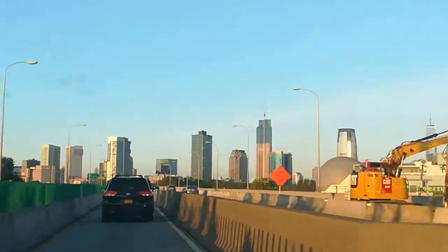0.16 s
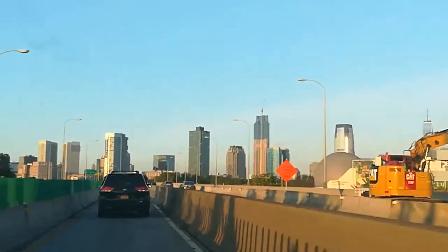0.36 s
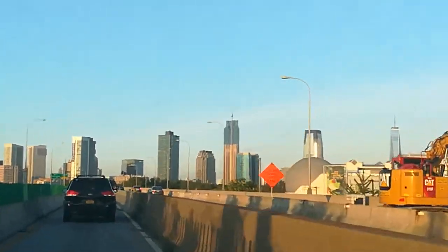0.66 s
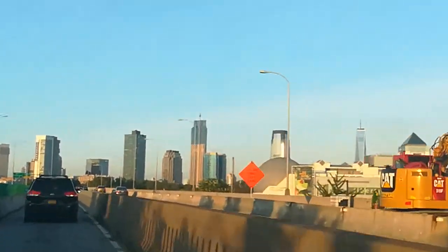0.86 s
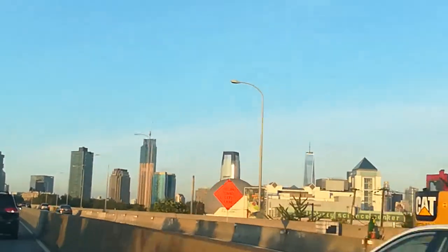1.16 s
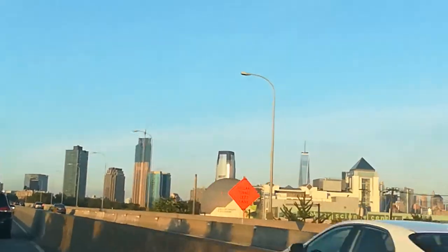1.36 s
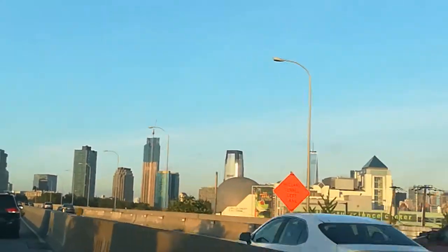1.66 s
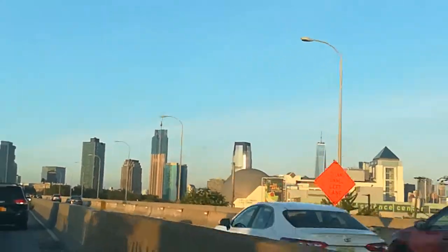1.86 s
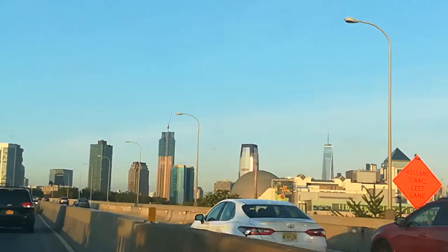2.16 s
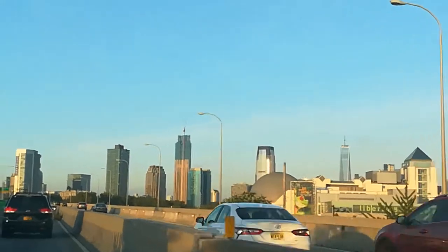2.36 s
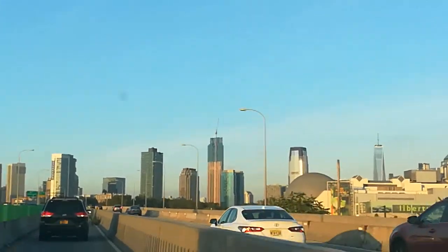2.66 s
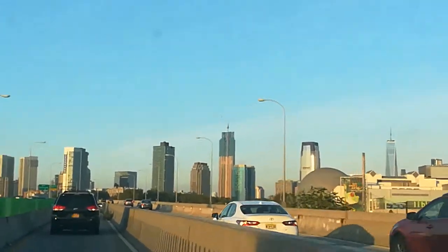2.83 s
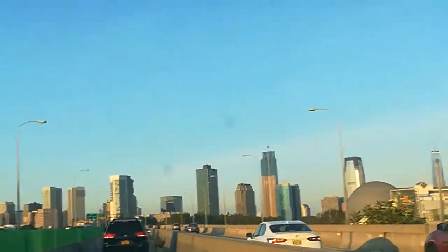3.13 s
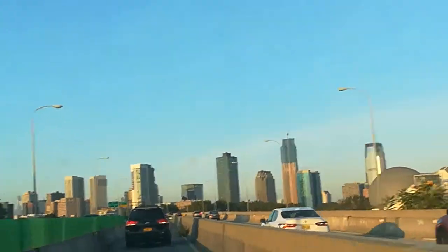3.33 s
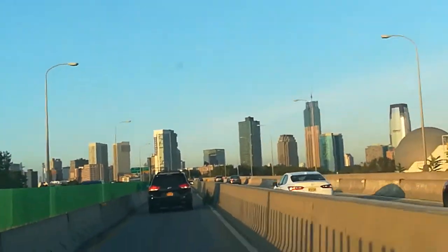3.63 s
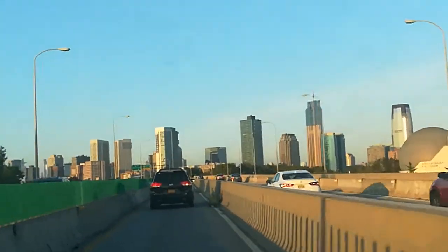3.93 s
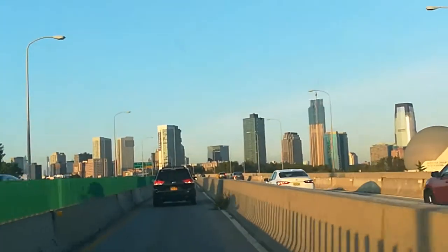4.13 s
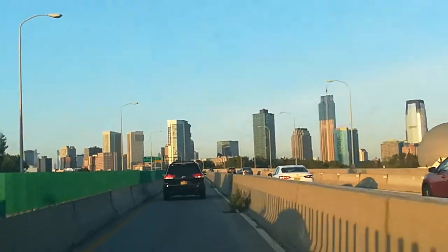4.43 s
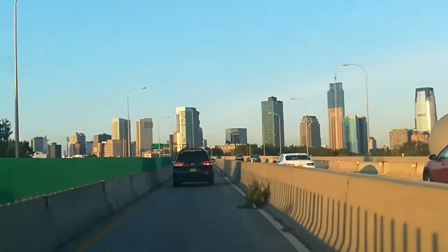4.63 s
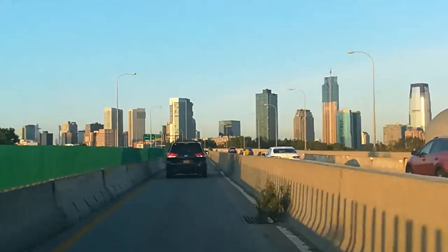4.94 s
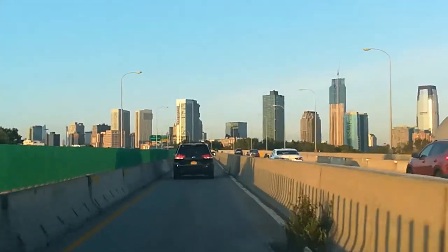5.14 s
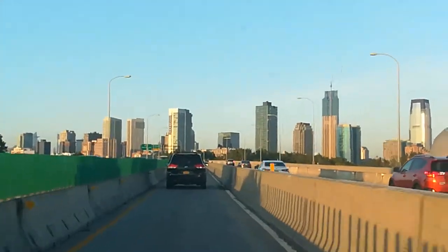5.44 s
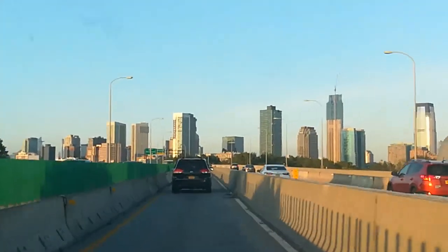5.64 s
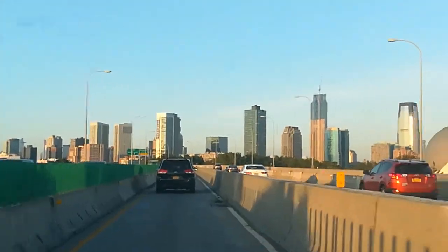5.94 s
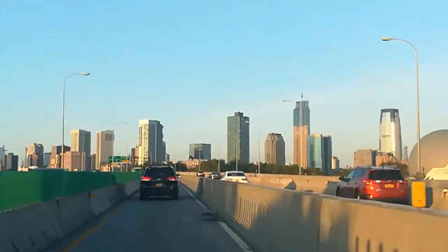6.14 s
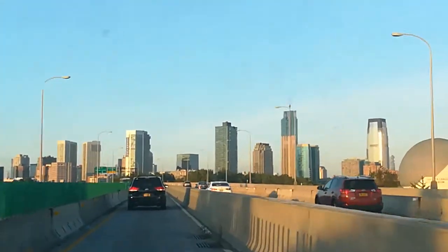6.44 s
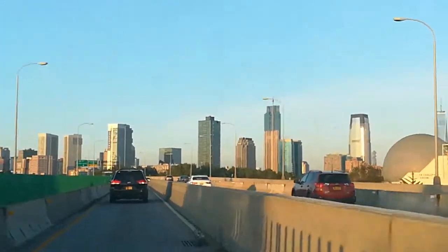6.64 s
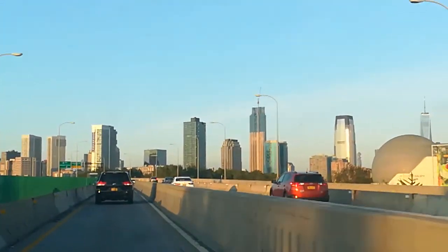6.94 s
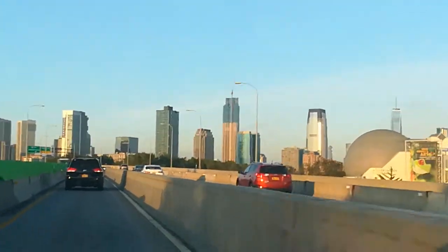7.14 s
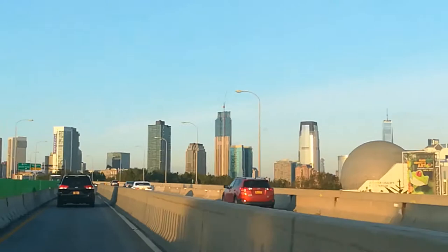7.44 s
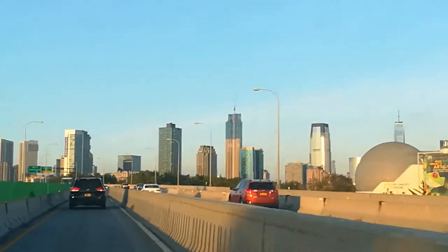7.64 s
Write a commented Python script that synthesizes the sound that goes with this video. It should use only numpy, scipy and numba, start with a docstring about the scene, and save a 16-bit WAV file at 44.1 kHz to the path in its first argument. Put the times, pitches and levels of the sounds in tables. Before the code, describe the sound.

A car cruises along a concrete highway, heard from inside through a hand-held stereo microphone near the windscreen. A deep, uneven rumble and cabin drone run throughout, with tyre roar and a softer wind hiss coming through the glass. From about 1 to 1.8 seconds the tyres knock lightly over seams, and plastic trim gives small, high squeaks and ticks towards the left. Between 2.3 and 3.1 seconds comes the loudest part, a run of heavy thumps and low booms, with sharp overload clicks around 2.7 seconds. The overall level then drops a little and stays there. The rumble carries on with gentle swells and a few faint rattles between 3.8 and 6 seconds, while the hiss shifts subtly in tone as the microphone turns. Another cluster of dull thumps arrives from about 7 to 7.6 seconds, over the continuing road noise.

```python
"""Car cabin on a concrete overpass

From inside the cruising car, on a hand-held two-microphone recorder close to the windscreen.
The rough road shakes the body and booms in the cabin's low modes; the tyres thump over seams.
Tyre roar and wind hiss come through the glass, the trim rattles and squeaks, and the hardest bumps click
with overload. As the hand turns, a near echo on the left and a hollow on the right slide in pitch."""
import sys
import numpy as np
from scipy import signal
from scipy.fft import rfft, irfft, next_fast_len
from scipy.io import wavfile
from scipy.ndimage import uniform_filter1d
from numba import njit

SR = 44100
rng = np.random.default_rng(int(sys.argv[2]) if len(sys.argv) > 2 else 0)


def output_pcm(signal):
    """Save a mono or channel-first signal as 16-bit PCM at the path in sys.argv[1].

    Samples are clipped to [-1, 1] before scaling.
    """
    pcm = np.clip(np.atleast_2d(signal).T, -1, 1) * 32767
    wavfile.write(sys.argv[1], SR, np.round(pcm).astype(np.int16))


N = 343539

# Balance of the microphone pair: (frequency [Hz], left over right [dB])
MIC_BALANCE = [(150, 0), (270, 1), (450, 0.5), (740, 4.5), (1220, 0.5), (1800, 3.5), (2300, 3), (2800, 2),
               (3400, 3.5), (5500, 4), (7000, -4.5), (9000, -10.5), (12500, -10), (15000, -3)]
# Part of the sound that each microphone has to itself: (frequency [Hz], level against the whole [dB])
MIC_OWN_SHARE = [(30, -33), (70, -25), (130, -20), (200, -6), (270, -9.5), (330, -2.5), (520, -3),
                 (700, -6.5), (900, -1), (1800, -2), (2500, -3), (3200, -2), (5000, -1), (9000, 0)]
# Standing waves between glass and dashboard at each microphone: (frequency [Hz], width [Hz], weight [dB])
LEFT_STANDING_WAVES = [(433, 59, 2.5), (580, 410, -8), (825, 44, 0.5), (1010, 25, 3.5), (3060, 93, 1.5)]
RIGHT_STANDING_WAVES = [(536, 12, 5.5), (666, 35, 7.5), (1003, 97, -1), (1175, 90, 1), (1486, 24, 6.5),
                        (2860, 70, -9)]
# The hand turns: (time [s], band lifted on the left [Hz], echo strength [0-1], hollow on the right [Hz])
HAND_TURNS = [(0, 2100, 0.06, 1730), (.6, 2180, 0.1, 1770), (1.0, 4560, 0.33, 2100),
              (1.5, 5400, 0.46, 2120), (1.9, 4340, 0.38, 2050), (2.8, 4150, 0.2, 1950),
              (3.1, 5030, 0.3, 1950), (3.4, 3950, 0.22, 1970), (4.3, 3850, 0.32, 1970),
              (4.7, 2190, 0.07, 1820), (6.0, 2150, 0.06, 1760), (6.5, 2400, 0.26, 1660),
              (7.79, 2420, 0.35, 1550)]
# How the recorder is held: (time [s], pose [0 tipped, 1 facing ahead, 2 or more turned aside])
RECORDER_POSE = [(0, 1.2), (.6, 1.4), (.95, 1.8), (2.9, 2.7), (4.35, 1.75), (4.7, 1.2), (6.0, 0.73),
                 (6.5, 0.05), (7.0, 0.3), (7.79, 0.15)]
# Peaks and dips from glass and hand close to each microphone:
# (frequency [Hz], width [Hz], gain tipped [dB], gain ahead [dB], gain aside [dB])
LEFT_POSE_COLOUR = [(844, 100, 1, 1.5, 1), (980, 120, 0, -4.5, -2), (1200, 150, 4, 5.5, 3),
                    (1450, 210, -2, -7, 2), (1730, 180, -1, -5, -5.5), (2100, 150, 0, 9, 1),
                    (2190, 100, 2, -2, 0), (2416, 81, 4.5, 6.5, 2.5), (2700, 200, -0.5, 3.5, 1),
                    (3150, 200, -1, 3.5, -1.5), (3680, 200, 0.5, -5.5, 0), (4070, 300, -0.5, -2, 1),
                    (4640, 200, 4.5, 2.5, 1), (5720, 400, 3, 4.5, 0), (7400, 500, 3, 6.5, 3)]
RIGHT_POSE_COLOUR = [(1100, 120, -1.5, 1, 1), (1340, 250, -1.5, -1.5, -3), (2017, 120, 10.5, 7, 8),
                     (1765, 110, -7, 2, 3), (2270, 240, 2, -2, 2.5), (2660, 320, -3.5, -1.5, -2.5),
                     (3130, 250, 0, 2, -2.5), (3680, 200, -10, -4.5, -3), (3870, 200, 7, 1.5, 4.5),
                     (4150, 200, -1, 3, -2), (5200, 350, 5, 4, -3), (5840, 250, 2, -4, 8.5)]

# Tyres heard through the glass: (time [s], roar [dB], low tread whine [dB], high tread whine [dB])
TYRE_LEVELS = [(0, -39, -68, -68), (.8, -38.5, -53, -52), (1.0, -37.5, -47, -55), (1.3, -39, -51, -56),
               (1.6, -35.5, -47, -50), (2.2, -38.5, -52, -61), (2.35, -38.5, -58, -61),
               (2.9, -38, -58, -57), (3.2, -35.5, -65, -72), (3.4, -38.5, -47, -64), (4.3, -37.5, -60, -60),
               (5.2, -38, -70, -73), (6.0, -39, -59, -49), (6.4, -39.5, -58, -54), (6.9, -37.5, -55, -50),
               (7.4, -39.5, -53, -45.5), (7.79, -36.5, -68, -51)]
# Spectra of tyre roar and wind hiss: (frequency [Hz], relative level [dB])
ROAR_SPECTRUM = [(170, -16.5), (290, -5.5), (306, -3), (363, -8), (422, -8.5), (472, -9), (518, -9.5),
                 (754, -11), (1010, -12), (1400, -22.5), (1820, -18.5), (3080, -120)]
WIND_SPECTRUM = [(760, -30), (1300, 2.5), (1530, 1), (2050, -2), (2250, -2), (2860, -3.5), (3180, -4),
                 (3600, -3), (4760, -6), (5740, -8.5), (6300, -10.5), (9640, -19), (15600, -26.5)]
# Tread blocks singing, low and high: (frequency [Hz], width [Hz], relative level [dB])
LOW_TREAD_BANDS = [(885, 79, -4), (978, 60, 3)]
HIGH_TREAD_BANDS = [(1513, 87, 0.5), (1616, 67, 2.5)]
# Sharp ticks: trim rattles, and overload clicks on the hardest bumps:
# (time [s], peak [dB], decay [s], low edge [Hz], top edge [Hz])
SHARP_TICKS = [(1.302, -45, .004, 8000, 12000), (1.487, -50, .004, 11000, 15400),
               (1.681, -48, .004, 11500, 15400), (1.733, -44, .004, 8000, 15000),
               (2.344, -50, .005, 11000, 15400), (2.6845, -32, .001, 2800, 15400),
               (2.754, -27, .008, 2800, 7000), (2.757, -40, .008, 7000, 15400),
               (2.821, -43, .003, 5000, 13000), (2.98, -44, .004, 8000, 15400),
               (2.752, -29, .01, 1200, 2800), (3.81, -48, .004, 11500, 15400),
               (4.35, -50, .015, 13500, 15400), (4.456, -46, .006, 12300, 13300),
               (5.264, -43, .006, 8500, 13000), (5.285, -43, .022, 8500, 14500),
               (6.024, -47, .005, 8000, 12000), (6.072, -47, .009, 11500, 15400)]
# The main trim squeaks, near the left microphone: (time [s], pitch [Hz], level [dB], length [s])
TRIM_SQUEAKS = [(1.27, 5770, -56, 0.046), (1.378, 5700, -40.5, 0.026), (1.46, 6200, -47, .035),
                (1.463, 4600, -45, 0.041), (1.486, 5700, -50, .04), (1.548, 5300, -44, 0.055),
                (1.585, 5250, -44, 0.07), (1.587, 5950, -47, 0.034), (1.62, 6250, -49, 0.066),
                (1.668, 5300, -46, 0.032), (1.685, 5950, -49, 0.037), (1.72, 4700, -43, 0.021),
                (1.753, 5200, -48, .025)]

# Roughness of the road under the wheels: (time [s], body boom [dB], cabin drone [dB], tyre hum [dB])
ROAD_ROUGHNESS = [(0, -25.5, -30, -29.5), (.5, -28, -24.5, -34), (.9, -20, -26, -30),
                  (1.2, -25.5, -28, -30.5), (1.65, -20.5, -22.5, -30.5), (2.2, -27, -30.5, -32),
                  (2.3, -23, -20.5, -29), (2.6, -15, -22, -29.5), (2.85, -20, -20, -29.5),
                  (3.1, -19, -21.5, -31.5), (3.3, -21, -22, -31), (3.9, -25, -29, -32),
                  (4.4, -19.5, -23.5, -31), (4.85, -28, -24.5, -32), (5.3, -25, -24.5, -30.5),
                  (5.9, -21.5, -26, -32), (6.2, -27, -29, -34), (6.9, -24, -25, -28),
                  (7.3, -15, -18, -32.5), (7.79, -22, -26, -33)]
# Modes of the body on its mounts, of the cabin air, and of tyre cavity and floor:
# (frequency [Hz], width [Hz], relative level [dB])
BODY_MODES = [(19.5, 3.8, 6.5), (27.5, 8.2, 5), (39.4, 6.5, 2), (43.1, 10.3, 4)]
CABIN_MODES = [(79.4, 22.7, -1), (98.3, 8.8, -1.5), (123.5, 14.8, -2.5), (136, 17.8, -5)]
TYRE_FLOOR_MODES = [(167.8, 32.5, -0.5), (209, 61, -5.5), (244.3, 60, -5.5), (267.5, 20.8, -2)]
# The upper body modes against the lower ones: (time [s], gain [dB])
UPPER_BODY_GAIN = [(0, 2), (.9, 3.5), (1.7, 1.5), (2.3, 0.5), (2.5, -6), (2.8, -1.5), (3.1, 3.5),
                   (4.4, 1.5), (5.1, 3), (5.4, 3), (5.9, 6), (6.4, 4.5), (7.0, 2), (7.79, 0)]
# The body heaves on its springs: (time of the crest [s], boom [dB])
BODY_HEAVES = [(.21, -18), (.77, -18), (1.0, -31), (1.72, -21), (2.33, -8.5), (2.44, -22), (2.544, -2),
               (2.62, -15), (2.69, -2.5), (2.75, -5), (2.99, -1), (3.07, -4.5), (3.5, -27), (4.41, -17),
               (5.12, -17), (5.2, -21), (5.28, -20), (5.33, -11.5), (5.8, -16), (5.9, -28), (7.17, -12),
               (7.3, -26), (7.4, -15), (7.54, -10), (7.62, -18)]
# Wheels over seams, mostly front then rear: (time [s], knock strength [dB], left over right [dB],
# knock centre [Hz], cabin drone strength [dB], tyre hum strength [dB])
ROAD_SEAMS = [(1.0, -39, -8, 900, -20, -25), (1.18, -41, -13, 660, -23, -37),
              (1.51, -34.5, -11, 990, -20.5, -24), (1.681, -31, -3, 680, -23, -50),
              (2.268, -45, 0, 600, -19.5, -34), (2.295, -35, 0, 700, -14, -28),
              (2.387, -42, 0, 500, -32, -41), (2.455, -27, 0, 840, -13, -24.5),
              (2.531, -30, -1, 1000, -17.5, -41), (2.56, -29, -11, 700, -37, -45),
              (2.591, -26, -1, 1080, -34, -36), (2.645, -43, -6, 1780, -26, -22),
              (2.769, -32, 5, 800, -14.5, -20), (2.849, -33, 9, 700, -14.5, -48),
              (2.95, -28, 0, 705, -8.5, -26), (7.06, -38, 5, 400, -23, -33), (7.155, -26, 3, 403, -27, -34),
              (7.184, -32, -1, 407, -23, -26), (7.24, -32, -3, 450, -19, -33),
              (7.343, -23.5, 2.5, 426, -18, -21.5), (7.57, -46, 0, 400, -37, -25)]
# Dashboard panel resonances: (frequency [Hz], width [Hz])
DASHBOARD_PANELS = [(400, 150), (670, 10), (860, 65), (1010, 30), (1170, 90), (1480, 60), (1980, 58)]

RIGHT_LAG_S = 0.00059   # roar and wind reach the right microphone later
FFT_SIZE = next_fast_len(N)
FREQS = np.maximum(np.fft.rfftfreq(FFT_SIZE, 1 / SR), 1)


def from_db(db):
    """Gain of a level in dB."""
    return 10 ** (np.asarray(db) / 20)


def unit_rms(x):
    """The signal scaled to rms 1."""
    return x / np.sqrt(np.mean(x ** 2) + 1e-20)


def filtered(x, kind, hz, order=2):
    """The signal through a Butterworth filter."""
    return signal.sosfilt(signal.butter(order, hz, kind, fs=SR, output="sos"), x)


def curves(table):
    """One curve for each column after the time, sample by sample."""
    times, *columns = np.transpose(table)
    return [np.interp(np.arange(N) / SR, times, column) for column in columns]


def spectrum_db(table):
    """Levels at FREQS, joined along a log frequency axis."""
    hz, db = np.transpose(table)
    return np.interp(np.log(FREQS), np.log(hz), db)


def modes(table):
    """Magnitude of resonances driven by unrelated forces; steep skirts leave valleys between them."""
    powers = (from_db(db) ** 2 / (1 + (2 * (FREQS - hz) / width) ** 2) ** 1.505
              for hz, width, db in table)
    return np.sqrt(sum(powers))


def drift(rate_hz):
    """A slow random wander of rms about 1."""
    hop, settle = 40, 2000
    pole = np.exp(-2 * np.pi * rate_hz * hop / SR)
    noise = rng.standard_normal(N // hop + settle + 2)
    slow = signal.lfilter([1], [1, -2 * pole, pole * pole], noise)[settle:]
    return np.interp(np.arange(N) / hop, np.arange(len(slow)), unit_rms(slow))


@njit
def moving_peak(x, hz, width_hz):
    """A resonance whose centre moves; gain 1 on top."""
    out, r = np.zeros(len(x)), np.exp(-np.pi * width_hz / SR)
    for i in range(2, len(x)):
        drive = (1 - r * r) / 2 * (x[i] - x[i - 2])
        out[i] = drive + 2 * r * np.cos(2 * np.pi * hz[i] / SR) * out[i - 1] - r * r * out[i - 2]
    return out


def noise_at_mics(colour, lag_s=0):
    """Coloured cabin noise at the pair: a shared part plus each microphone's own; mid rms 1."""
    shared, own_left, own_right = rfft(rng.standard_normal((3, FFT_SIZE)))
    own = from_db(np.minimum(spectrum_db(MIC_OWN_SHARE), 0))
    shared = shared * np.sqrt(1 - own ** 2)
    delay = np.exp(-2j * np.pi * FREQS * lag_s)
    tilt = from_db(spectrum_db(MIC_BALANCE) / 2)
    left = (shared + own * own_left) * tilt * np.hypot(1, modes(LEFT_STANDING_WAVES))
    right = (shared * delay + own * own_right) / tilt * np.hypot(1, modes(RIGHT_STANDING_WAVES))
    pair = irfft(colour * np.array([left, right]), FFT_SIZE)[:, :N]
    return pair / np.sqrt(np.mean(pair.mean(0) ** 2))


def bursts(events, rise_s):
    """Short noise bursts, each in its band, with a separate grain at each microphone."""
    out, t = np.zeros((2, N)), np.arange(SR // 5) / SR
    for start_s, db, pan_db, fall_s, low_hz, high_hz in events:
        envelope = (1 - np.exp(-t / min(rise_s, fall_s))) * np.exp(-t / fall_s)
        burst = filtered(rng.standard_normal((2, len(t))) * envelope, "band", [low_hz, high_hz])
        gains = from_db([[db + pan_db / 2], [db - pan_db / 2]])
        out[:, round(start_s * SR):][:, :len(t)] += burst / abs(burst).max() * gains
    return out


def swells(times, levels_db, rise_s, fall_s):
    """Power of bell-shaped swells that crest at the given times."""
    reach = SR // 5
    t, power = np.arange(-reach, reach) / SR, np.zeros(N + SR)
    bell = np.exp(-(t / np.where(t < 0, rise_s, fall_s)) ** 2)
    for crest_s, db in zip(times, levels_db):
        power[round(crest_s * SR):][:len(t)] += from_db(db) ** 2 * bell
    return power[reach:][:N]


def faint_whine(hz=14357):
    """A thin tone far in the background, to the left, wavering slightly."""
    tone = np.sin(2 * np.pi * np.cumsum(hz + 3 * drift(5)) / SR)
    return tone * from_db([[-81], [-93]])


def trim_squeaks(faint_from_s=1.2, faint_to_s=1.78):
    """Plastic rubs near the left microphone: narrow noise swells and fades, with faint rubs at random."""
    out = np.zeros(N)
    faint = [(rng.uniform(faint_from_s, faint_to_s), rng.uniform(5100, 6500), -56, 0.044)
             for _ in range(16)]
    for start_s, hz, db, length_s in TRIM_SQUEAKS + faint:
        size = round(length_s * SR)
        friction = rng.standard_normal(SR // 10)[:size]
        rub = moving_peak(friction, np.full(size, float(hz)), width_hz=300.0)
        out[round(start_s * SR):][:size] += from_db(db) * unit_rms(rub) * np.hanning(size)
    return out * from_db([[0], [-6]])


def sharp_ticks():
    """Rattles of the trim and overload clicks, leaning left or right as the pair hears their low edge."""
    balance_hz, balance_db = np.transpose(MIC_BALANCE)
    ticks = [(start_s, db, np.interp(low_hz, balance_hz, balance_db), fall_s, low_hz, top_hz)
             for start_s, db, fall_s, low_hz, top_hz in SHARP_TICKS]
    return bursts(ticks, rise_s=0.0072)


def wind_hiss(level_db=-43, flicker_db=0.75):
    """An even wind on the glass, fluttering a little; its treble flickers on its own."""
    gain = from_db(level_db + 0.55 * drift(32))
    hiss = gain * noise_at_mics(from_db(spectrum_db(WIND_SPECTRUM)), RIGHT_LAG_S)
    return hiss + (from_db(flicker_db * drift(7.5)) - 1) * filtered(hiss, "high", 7000)


def tyre_roar(level_db, patches, throb_db=2.5):
    """Tyres roar on the road; the low part throbs unevenly and swells on rough patches."""
    gain = from_db(level_db + 0.88 * drift(2.9))
    roar = gain * noise_at_mics(from_db(spectrum_db(ROAR_SPECTRUM)), RIGHT_LAG_S)
    throb = from_db(throb_db * drift(3.0) + 1.4 * patches)
    return roar + (throb - 1) * filtered(roar, "low", 533)


def near_echo(x, hz, strength):
    """A surface close to the microphone lifts two bands and cancels a lower one."""
    lifted = 1.27 * moving_peak(x, hz, width_hz=1400.0) + moving_peak(x, 1.27 * hz, width_hz=370.0)
    cancelled = moving_peak(x, 0.64 * hz, width_hz=1200.0)
    return x + strength * (lifted - cancelled)


def hollow(x, hz):
    """A hollow at the microphone rings on its pitch and an octave up."""
    return x + 0.57 * moving_peak(x, hz, width_hz=220.0) + 0.22 * moving_peak(x, 2 * hz, width_hz=420.0)


def sheen(echo_hz, fade_db_per_khz=11):
    """A narrow hiss in the centre that fades as the echo's lifted band climbs."""
    band = unit_rms(filtered(rng.standard_normal(N), "band", [3055, 3725]))
    climb_khz = (echo_hz - echo_hz.min()) / 1000
    return from_db(-58 - fade_db_per_khz * climb_khz) * band


def hand_held(pair):
    """Glass and hand close by colour each microphone; the colours blend from pose to pose."""
    pose = np.clip(curves(RECORDER_POSE)[0], 0, 2)
    out = np.zeros_like(pair)
    for mic, table in enumerate((LEFT_POSE_COLOUR, RIGHT_POSE_COLOUR)):
        spectrum = rfft(pair[mic], FFT_SIZE)
        for k in range(3):
            colour_db = sum(db[k] / (1 + (2 * (FREQS - hz) / width) ** 2) for hz, width, *db in table)
            weight = np.clip(1 - abs(pose - k), 0, 1)
            out[mic] += weight * irfft(spectrum * from_db(colour_db), FFT_SIZE)[:N]
    return out


def rush_through_glass(patches):
    """Tyre roar, wind and singing tread blocks, as the turning recorder picks them up."""
    roar_db, low_tread_db, high_tread_db = curves(TYRE_LEVELS)
    echo_hz, echo_strength, hollow_hz = curves(HAND_TURNS)
    left, right = tyre_roar(roar_db, patches) + wind_hiss()
    rush = np.array([near_echo(left, echo_hz, echo_strength), hollow(right, hollow_hz)]) + sheen(echo_hz)
    low_tread = from_db(low_tread_db) * noise_at_mics(modes(LOW_TREAD_BANDS))
    high_tread = from_db(high_tread_db) * noise_at_mics(modes(HIGH_TREAD_BANDS))
    return hand_held(rush + low_tread + high_tread)


def seam_knocks(band_octaves=0.67, fall_s=0.026):
    """The tyre's knock at each seam sets the dashboard panels ringing."""
    half_band = 2 ** (band_octaves / 2)
    hits = [(start_s, db, pan_db, fall_s, hz / half_band, hz * half_band)
            for start_s, db, pan_db, hz, *_ in ROAD_SEAMS]
    knocks = bursts(hits, rise_s=0.005) + 1e-18
    ringing = sum(signal.lfilter(*signal.iirpeak(hz, hz / width, SR), knocks)
                  for hz, width in DASHBOARD_PANELS)
    return 0.28 * knocks + 1.67 * ringing


def shaken_modes(table, road_db, jolt_power, span_s, steady_share=0.41):
    """Modes driven at random; the rumble is partly steadied so its loudness follows road and jolts."""
    rumble = noise_at_mics(modes(table))
    span = round(span_s * SR)
    chance_power = uniform_filter1d(uniform_filter1d(rumble.mean(0) ** 2, span), span)
    steadied = rumble / np.sqrt(chance_power + 0.035)
    road_power = from_db(road_db) ** 2
    power = road_power + jolt_power
    blend = (jolt_power + steady_share * road_power) / power
    return np.sqrt(power) * ((1 - blend) * rumble + blend * steadied)


def struck_modes(table, times, levels_db, boost_db=2.5, spread_db=2):
    """Each soft blow sets every mode ringing with a strength and sign of its own."""
    out, draws = np.zeros(N), rng.standard_normal((len(times), len(table), 2))
    for k, (hz, width, mode_db) in enumerate(table):
        polarity, scatter = draws[:, k].T
        blow_db = levels_db + mode_db + boost_db + spread_db * scatter
        blows = np.full(N, 1e-18)
        blows[(times * SR).astype(int)] = np.sign(polarity) * from_db(blow_db)
        r, angle = np.exp(-np.pi * width / SR), 2 * np.pi * hz / SR
        out += signal.lfilter([0, np.sin(angle)], [1, -2 * r * np.cos(angle), r * r], blows)
    return filtered(out, "low", 320)


def body_boom():
    """The body shakes on its mounts and heaves on its springs, nearly alike at both microphones."""
    boom_db, _, _ = curves(ROAD_ROUGHNESS)
    upper_db, = curves(UPPER_BODY_GAIN)
    heaves = swells(*np.transpose(BODY_HEAVES), rise_s=0.016, fall_s=0.017)
    boom = shaken_modes(BODY_MODES, boom_db, heaves, span_s=0.11)
    return boom + (from_db(upper_db) - 1) * filtered(boom, "band", [35.6, 62.3], order=1)


def cabin_rumble(patches, shake_late_s=0.0062, shake_db=-3):
    """The road drones in the cabin air and hums in tyres and floor; seams strike, then shake them."""
    _, drone_db, hum_db = curves(ROAD_ROUGHNESS)
    seam_s, *_, cabin_db, floor_db = np.transpose(ROAD_SEAMS)
    cabin_jolts = swells(seam_s + shake_late_s, cabin_db + shake_db, rise_s=0.015, fall_s=0.031)
    floor_jolts = swells(seam_s + shake_late_s, floor_db + shake_db, rise_s=0.015, fall_s=0.031)
    drone = shaken_modes(CABIN_MODES, drone_db + 1.33 * patches, cabin_jolts, span_s=0.039)
    hum = shaken_modes(TYRE_FLOOR_MODES, hum_db + 1.5 * patches, floor_jolts, span_s=0.015)
    cabin_thumps = struck_modes(CABIN_MODES, seam_s, cabin_db)
    floor_thumps = struck_modes(TYRE_FLOOR_MODES, seam_s, floor_db)
    return drone + hum + cabin_thumps + floor_thumps


def scene():
    """All the sound at the two microphones behind the windscreen."""
    patches = drift(rate_hz=4.2)   # patchy road surface swells drone, hum and roar together
    road = body_boom() + cabin_rumble(patches) + rush_through_glass(patches) + seam_knocks()
    return road + sharp_ticks() + trim_squeaks() + faint_whine()


def record(dry, sink_db=-4.5, cutoff_hz=15700):
    """The level sinks and stays down, the lowest air is cut, the loudest bumps clip, the top is cut."""
    gain = from_db(np.interp(np.arange(N) / SR, [2.79, 3.105], [0, sink_db]))
    clipped = np.clip(filtered(dry * gain, "high", 13), -0.99, 0.99)
    return signal.sosfilt(signal.ellip(16, 0.2, 80, cutoff_hz, fs=SR, output="sos"), clipped)


dry = scene()
out = record(dry)
output_pcm(out)
```